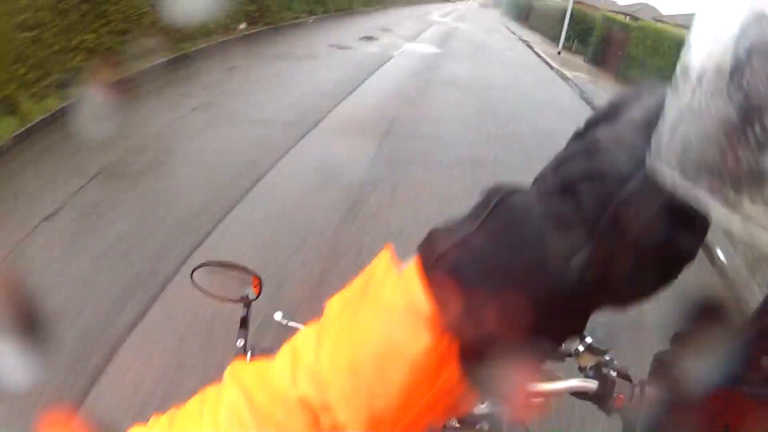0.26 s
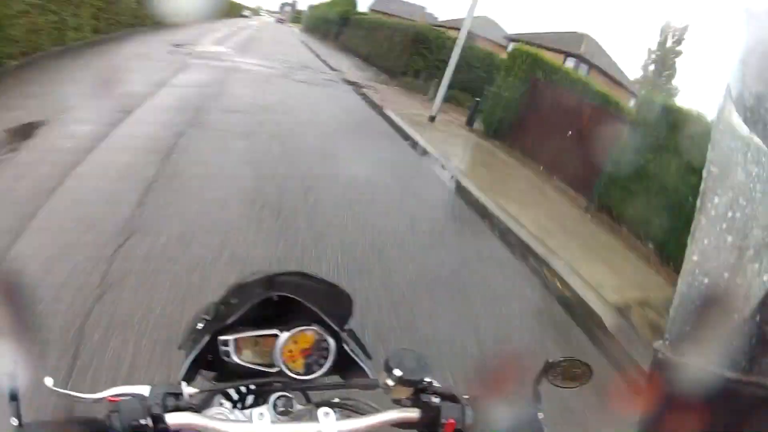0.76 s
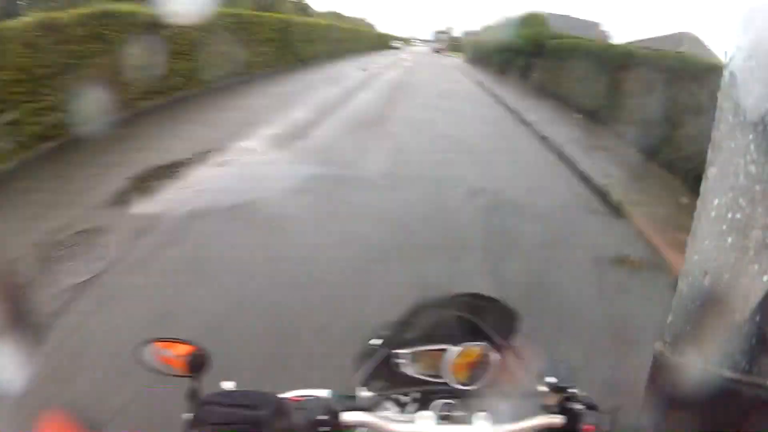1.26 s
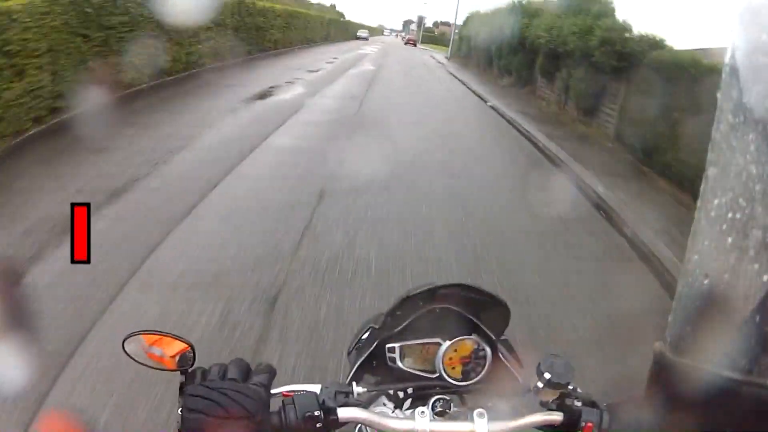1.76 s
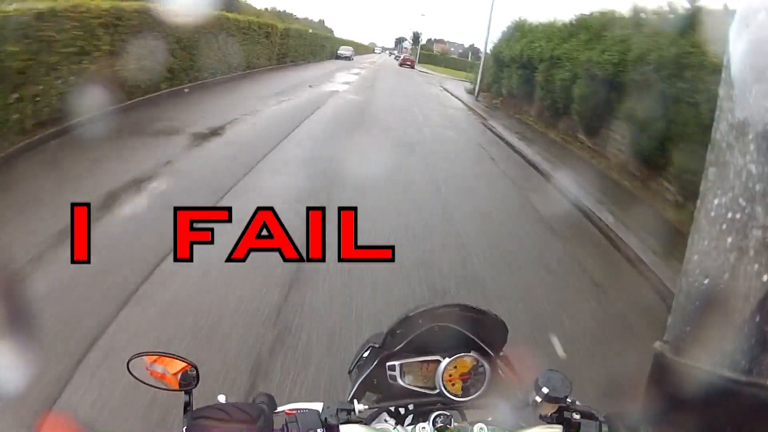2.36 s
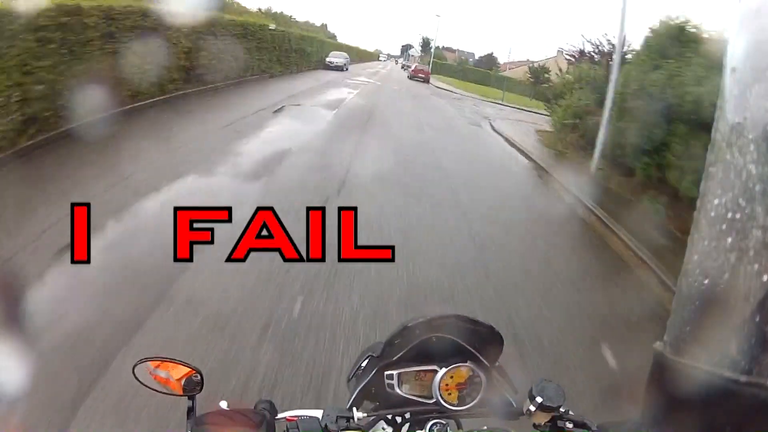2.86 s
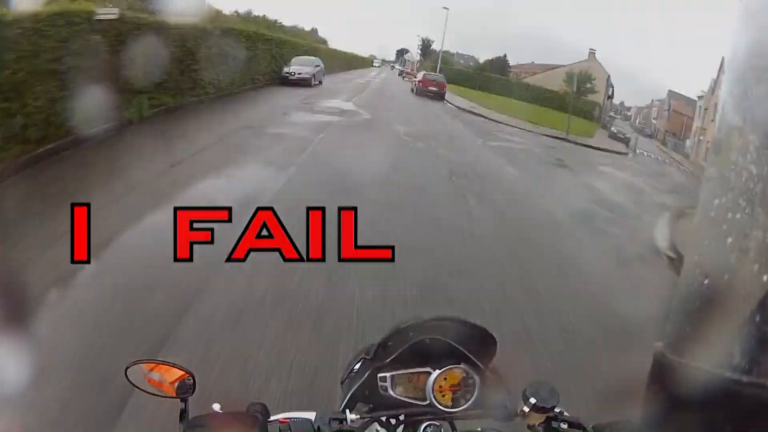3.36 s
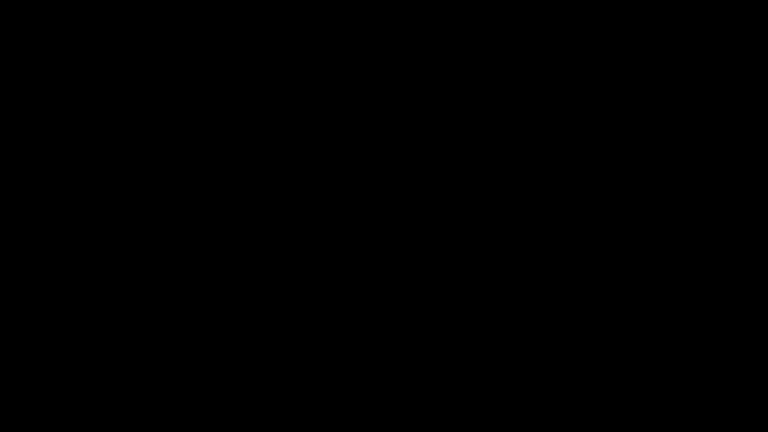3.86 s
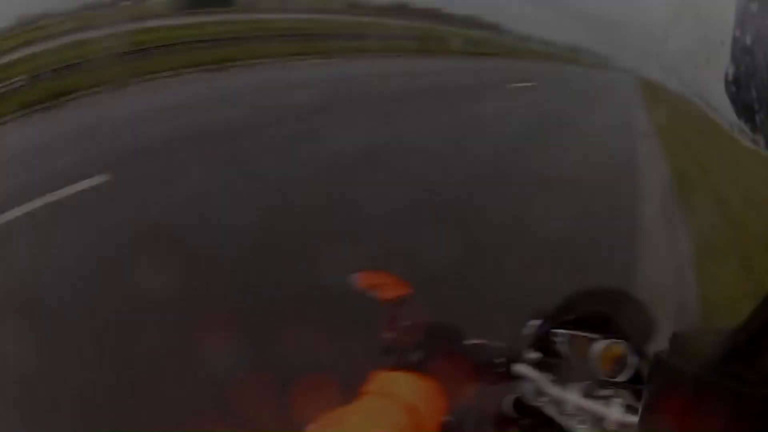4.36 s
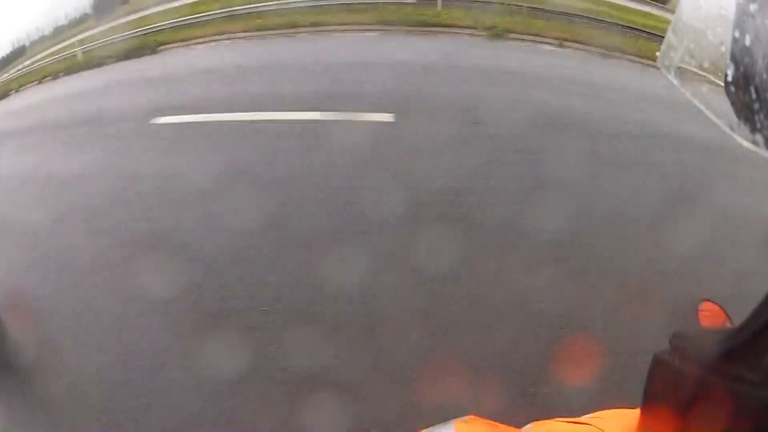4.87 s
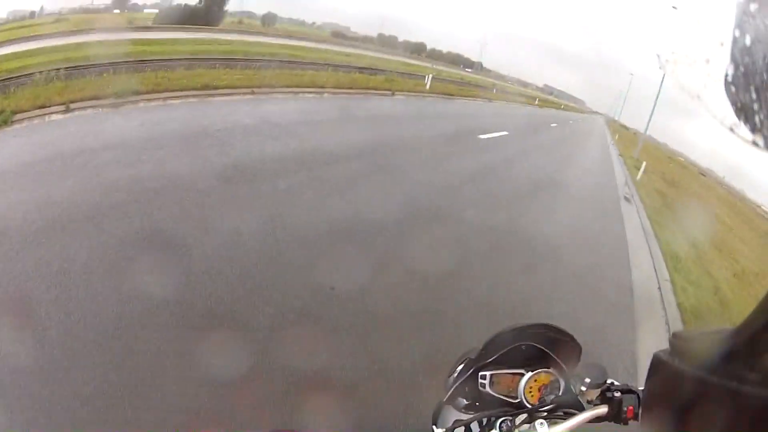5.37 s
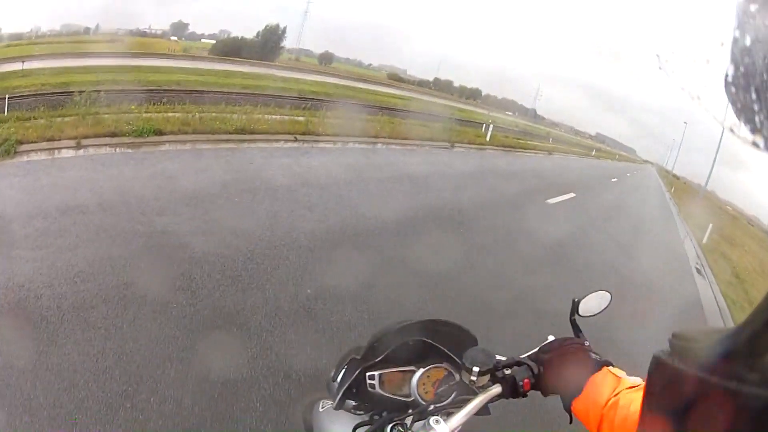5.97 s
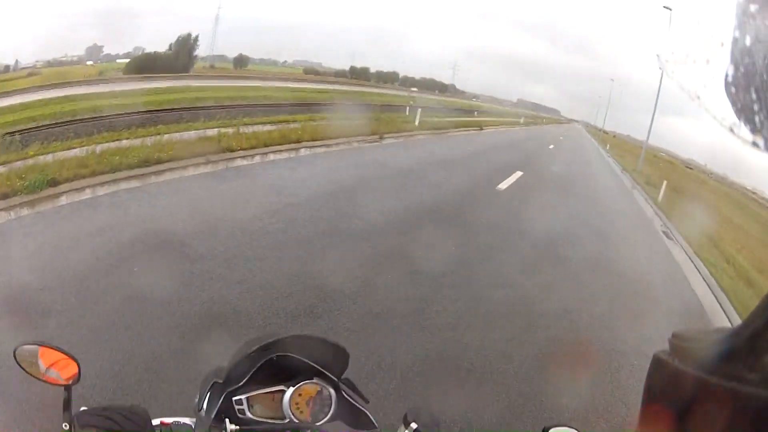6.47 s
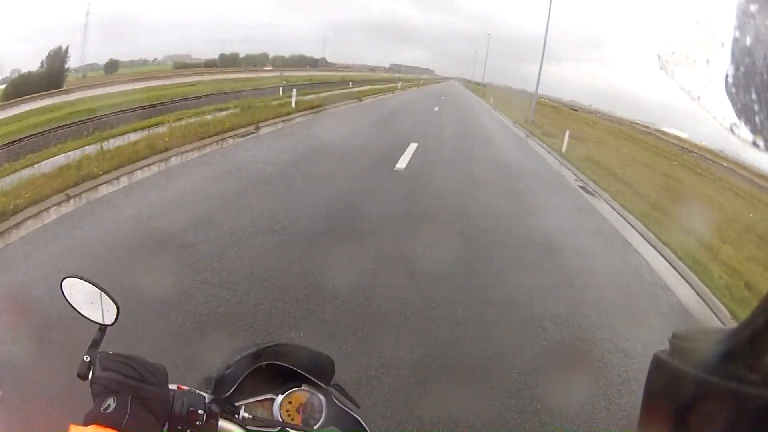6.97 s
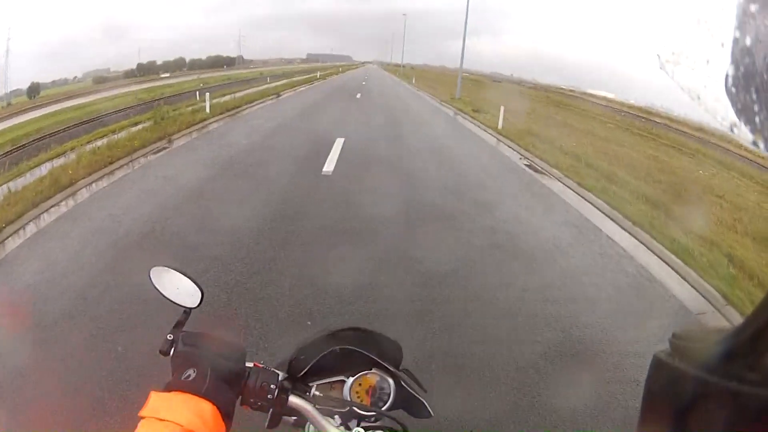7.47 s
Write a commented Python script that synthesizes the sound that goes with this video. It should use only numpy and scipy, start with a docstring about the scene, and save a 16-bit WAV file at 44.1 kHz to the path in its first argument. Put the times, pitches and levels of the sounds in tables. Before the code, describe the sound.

On a wet open road, wind roars and hisses around a cased helmet camera as a motorcycle pulls away, its rising drone half buried. A visor ratchets and slams shut, and raindrops splat sharply. The sound fades to silence, then returns much quieter: cloth swishes, the engine drops to a low pulsing idle with clatter and chirps, and drops tap the case.

```python
"""On a wet road, a helmet camera in a waterproof case rides a motorcycle through light rain.
Filtered noise roars and hisses round the case in gusts; two sine harmonics drone for the engine pulling away.
A glove slams the visor shut with short noise bursts; raindrops splat, and the loud hits duck the gain.
After a fade, pulses through a pipe make the three-cylinder engine sink to idle, with gear whine, valve clatter
and chirps; the jacket swishes as the rider looks back, and slower drops tap the ringing case."""
import sys
import numpy as np
from scipy import signal
from scipy.fft import rfft, irfft, next_fast_len
from scipy.io import wavfile
from scipy.ndimage import uniform_filter1d, map_coordinates

SR = 44100
rng = np.random.default_rng(int(sys.argv[2]) if len(sys.argv) > 2 else 0)


def wav_out(sig):
    """Save sig, one row per channel (or a flat mono array), as 16-bit PCM at SR to the path in sys.argv[1]."""
    wavfile.write(sys.argv[1], SR, np.round(np.clip(np.atleast_2d(sig).T, -1, 1) * 32767).astype(np.int16))


N = 340452  # length in samples


def amp(db):
    """Decibels to gain."""
    return 10 ** (np.asarray(db) / 20)


def unit(x):
    """Scaled to rms 1."""
    return x / np.sqrt(np.mean(x ** 2) + 1e-20)


def clock():
    """The time of every sample, in seconds."""
    return np.arange(N) / SR


def ramp(start_s, length_s):
    """0 before the start, rising straight to 1."""
    return np.clip((clock() - start_s) / length_s, 0, 1)


def bell(x, centre, width):
    """A bell of height 1 with its full width at half height."""
    return np.exp2(-np.minimum((2 * (x - centre) / width) ** 2, 40))


def bumps(rows, x):
    """dB of (centre, width, dB) bells: resonances along frequency, or swells along time."""
    return sum(db * bell(x, centre, width) for centre, width, db in rows)


def along(points, hz):
    """(Hz, value) points read on a log axis."""
    f, v = np.transpose(points)
    return np.interp(np.log(hz + 1), np.log(f + 1), v)


def curves(rows):
    """One value per sample for each column after the time."""
    s, *cols = np.transpose(rows)
    return [np.interp(clock(), s, c) for c in cols]


def noise():
    """Fresh white noise."""
    return rng.standard_normal(N)


def wobble(rate):
    """A smooth random curve, rate knots a second."""
    knots = rng.standard_normal(int(N * rate / SR) + 4)
    return map_coordinates(knots, [np.arange(N) * rate / SR])


def add(track, s, sound):
    """Mix a sound into the track at time s."""
    part = track[round(s * SR):][:len(sound)]
    part += sound[:len(part)]


def coloured(x, db_of):
    """x through a causal, minimum-phase filter whose gain in dB is db_of(Hz)."""
    m = 2 * next_fast_len(len(x) // 2 + 4096)
    cepstrum = irfft(np.log(amp(db_of(np.fft.rfftfreq(m, 1 / SR))) + 1e-6), m)
    # fold the cepstrum forward in time, so nothing sounds before its cause
    cepstrum[1:m // 2] *= 2
    cepstrum[m // 2 + 1:] = 0
    return irfft(rfft(x, m) * np.exp(rfft(cepstrum)), m)[:len(x)]


# resonances and dead bands of the waterproof case: centre_hz, width_hz, nominal gain_db
CASE_RESONANCES = [(723.5, 45, 5), (1210, 220, 5), (3660, 330, 8.5), (4874, 990, 8.5), (6005, 470, -10),
                   (7080, 840, 5.5), (8360, 240, 9), (9420, 1400, 5), (10680, 450, 5.5), (12070, 1420, -16),
                   (13160, 260, 9)]


def cased(x, spectrum, peaks=()):
    """x with its own colour, heard through the camera case, at rms 1."""
    def gain_db(hz):
        return along(spectrum, hz) + bumps(CASE_RESONANCES, hz) + bumps(peaks, hz)
    return unit(coloured(x, gain_db))


def strike(spectrum, contact_s, tilt_db, after_db, after_t60, click=0, peaks=()):
    """A first click, a short burst of contact force and a weak rattle after it, through the case; peak 1."""
    t = np.arange(SR // 20) / SR
    contact = np.exp(-(t / contact_s) ** 2)
    rattle = amp(after_db - 60 * t / after_t60)
    force = (contact + rattle) * rng.standard_normal(len(t))
    force[0] += click

    def gain_db(hz):
        case_db = 0.97 * bumps(CASE_RESONANCES, hz)
        brightness_db = tilt_db * np.log2(hz / 3000 + .1)
        return along(spectrum, hz) + case_db + bumps(peaks, hz) + brightness_db
    hit = coloured(force, gain_db)
    return hit / np.abs(hit).max()


# gusts and lulls in the air stream: centre_s, length_s, roar_db, hiss_db
GUST_SWELLS = [(0.662, 0.12, 3.5, 6), (0.88, 0.28, -1, 0), (1.13, 0.2, 3, -1), (1.32, 0.19, 4.5, 3),
               (2.05, 0.37, 0.5, 1), (2.3, 0.061, 1, 1), (2.606, 0.16, 1, 0), (2.95, 0.3, 2.5, 0),
               (3.457, 0.14, 3, 1), (4.577, 0.2, 8, -1), (4.96, 0.33, 8.5, 0), (5.55, 0.12, 4.5, 0),
               (7.059, 0.06, 11, 0), (7.401, 0.1, 7.5, -4)]


def gusts():
    """dB that the gusts add to the roar and to the hiss."""
    t = clock()
    return sum(np.outer([roar_db, hiss_db], bell(t, s, length_s)) for s, length_s, roar_db, hiss_db in GUST_SWELLS)


# colour of the low thumping: pitch_hz, relative level_db
BUFFET_COLOUR = [(12, -20), (25, -9), (40, 1.5), (55, -10), (90, -21.5), (200, -78.5)]
# the camera shaking on its mount: centre_hz, width_hz, gain_db
MOUNT_RESONANCE = [(39, 5.4, 9.5)]
# large eddies that shake the camera: centre_s, length_s, level_db on top of the steady shaking
EDDY_HITS = [(0.22, 0.35, -23.5), (0.63, 0.13, -30.5), (1.09, 0.1, -35), (1.325, 0.074, -32),
             (1.598, 0.15, -44), (2.094, 0.25, -26), (2.362, 0.08, -23), (2.6, 0.062, -29.5),
             (3.102, 0.11, -28), (3.45, 0.14, -26.5), (3.675, 0.07, -28), (4.623, 0.07, -23),
             (4.84, 0.34, -44), (5.58, 0.17, -54), (6.3, 0.16, -52), (7.2, 0.28, -55)]


def buffeting(steady_db):
    """The camera shakes on its mount, a little all the time and harder in each large eddy."""
    t = clock()
    force = amp(steady_db) + sum(amp(db) * bell(t, s, length_s) for s, length_s, db in EDDY_HITS)
    return force * cased(noise(), BUFFET_COLOUR, MOUNT_RESONANCE)


# colour of the roar, in both rides: pitch_hz, relative level_db
ROAR_COLOUR = [(30, -34.5), (65, -7.5), (110, -2), (175, -1.5), (290, -9.5), (400, -14.5), (600, -22.5),
               (1000, -18.5), (1600, -34.5), (4000, -41.5), (16000, -57.5)]
SLOW_BUFFET_DB, SLOW_ROAR_DB = -59.5, -57  # at walking pace, between gusts


def breeze():
    """Light air bumps the slowly moving case."""
    roar_db = SLOW_ROAR_DB + gusts()[0]
    return buffeting(SLOW_BUFFET_DB) + amp(roar_db) * cased(noise(), ROAR_COLOUR)


# colour of the hiss: pitch_hz, relative level_db
HISS_COLOUR = [(200, -43), (700, -1), (1600, -3.5), (2800, 1), (4500, -10), (7000, -9.5), (11000, -13.5),
               (15300, -18)]
# air whistling in the gaps of the case: centre_hz, width_hz, gain_db
GAP_WHISTLES = [(2380, 425, 10), (9655, 520, 10), (14370, 1000, 14.5)]
# the raised arm stirs up the roar: centre_s, length_s, gain_db
ARM_SWELL = [(0.2, 0.36, 7.5)]
# the bike gathers speed until TOP_SPEED_S; the hiss grows faster than the roar
TOP_SPEED_S, ROAR_DB_PER_S, HISS_DB_PER_S = 2.65, 1.5, 3
FAST_ROAR_DB, FAST_HISS_DB = -25, -25  # at top speed, between gusts
FAST_BUFFET_DB = -35  # steady throughout


def ride_wind():
    """The air roars on the case and hisses in its gaps, louder with speed and in gusts."""
    t = clock()
    to_go_s = np.maximum(TOP_SPEED_S - t, 0)
    roar_gust_db, hiss_gust_db = gusts()
    flutter = wobble(45)  # shared by roar and hiss
    roar_db = FAST_ROAR_DB - ROAR_DB_PER_S * to_go_s + roar_gust_db + bumps(ARM_SWELL, t)
    hiss_db = FAST_HISS_DB - HISS_DB_PER_S * to_go_s + hiss_gust_db
    roar_db = roar_db + 0.84 * flutter + 1.7 * wobble(14)
    hiss_db = hiss_db + 1.15 * flutter + 0.66 * wobble(130)
    roar = amp(roar_db) * cased(noise(), ROAR_COLOUR)
    hiss = amp(hiss_db) * cased(noise(), HISS_COLOUR, GAP_WHISTLES)
    return buffeting(FAST_BUFFET_DB) + roar + hiss


# raindrops falling on the slow bike: start_s, peak_db, brightness_db_per_octave, ring_hz
SLOW_DROPS = [(3.9635, -20, -0.5, 1580), (4.568, -22, 0.5, 2450), (4.62, -25.5, -0.5, 1700),
              (4.6529, -28, -4, 1930), (4.7535, -22.5, 2, 3560), (5.189, -35, -1, 1950),
              (5.288, -25, 0.5, 2250), (5.604, -12.5, 0, 2470), (5.7127, -32, 0, 1950),
              (6.1643, -17.5, 0, 3334), (6.6062, -18, 0, 3000), (6.7883, -30.5, 0.5, 2496),
              (6.8935, -19.5, 0, 2130), (7.0292, -31.5, 0, 1950)]
# colour of a tap: pitch_hz, relative level_db
TAP_COLOUR = [(300, -50), (850, -12), (1200, -5), (1700, 2.5), (2400, -7), (3300, -1.5), (4500, -13.5),
              (8000, -8.5), (11000, -16), (15000, -20)]
# rings common to all taps: centre_hz, width_hz, gain_db
TAP_RINGS = [(1180, 200, 6), (2337, 390, 12), (3060, 180, 5), (3940, 870, 2.5), (6300, 2400, -8),
             (14400, 700, 9)]
DROP_RING_WIDTH_HZ, DROP_RING_DB = 600, 6  # the ring that the landing spot favours


def slow_rain():
    """Falling drops tap the case, which rings for a few milliseconds, at a pitch set by where they land."""
    out = np.zeros(N)
    for s, db, tilt_db, ring_hz in SLOW_DROPS:
        rings = TAP_RINGS + [(ring_hz, DROP_RING_WIDTH_HZ, DROP_RING_DB)]
        tap = strike(TAP_COLOUR, 0.0019, tilt_db, after_db=-5.5, after_t60=0.016, click=11.0, peaks=rings)
        add(out, s, amp(db) * tap)
    return out


# raindrops hitting at riding speed: start_s, splat peak_db, thud_db relative to the splat
FAST_DROP_HITS = [(0.7092, -8.5, -24), (0.844, -17.5, -19), (1.3055, -15.5, -20), (1.3537, -11.5, -18),
                  (1.3681, 2, -11.5), (1.8212, -8, -26), (2.0976, -1.5, -4.5), (2.4396, 1.5, -8.5),
                  (2.6495, -5.5, -6.5), (3.302, 0, -1.5), (3.491, -11, -24)]
# colour of a splat: pitch_hz, relative level_db
SPLAT_COLOUR = [(300, -9.5), (1500, -6.5), (2400, 6.5), (3300, 7), (5000, -6), (8000, -6.5), (11000, -20),
                (15000, -47)]


def fast_rain():
    """At speed each drop splats on the case and gives its wall one low push."""
    out = np.zeros(N)
    u = np.arange(SR // 20) / SR / 0.0012  # time in units of 1.2 ms
    push = 2 * u * (2 - u) * np.exp(-u)
    for s, db, thud_db in FAST_DROP_HITS:
        splat = strike(SPLAT_COLOUR, 0.0029, tilt_db=5.0, after_db=-16.5, after_t60=0.014)
        add(out, s, amp(db) * (splat + amp(thud_db) * push))
    return out


def stroke(start_s, length_s, softness):
    """One movement: it speeds up from rest and slows to rest again."""
    return np.abs(np.sin(np.pi * ramp(start_s, length_s))) ** max(softness, .5)


# head turns that rub the jacket on the helmet: start_s, length_s, level_db, softness of the swell (exponent)
HEAD_TURNS = [(4.452, 0.19, -32, 0.56), (4.734, 0.56, -40.5, 2.4)]
# colour of the cloth: pitch_hz, relative level_db
CLOTH_COLOUR = [(150, 4.5), (400, -17), (800, -1.5), (1250, 2.5), (1800, -2), (2400, -6), (3000, -15),
                (5000, -27.5), (7500, -29), (10500, -17), (13500, -16), (15300, -28)]
CLOTH_SETTLE_S = 0.017  # the cloth rustles on a little after it has moved
# ribs of the weave in the first, quick turn: starting rate, time for it to halve, level
ZIP_HZ, ZIP_HALVING_S, ZIP_DB = 833, 0.085, -49


def jacket():
    """Stiff cloth slides over the helmet in tiny slips as the head turns; its weave zips in the quick turn."""
    sliding = sum(amp(db) * stroke(s, length_s, softness) for s, length_s, db, softness in HEAD_TURNS)
    keep = np.exp(-1 / (CLOTH_SETTLE_S * SR))
    sliding = signal.lfilter([1 - keep], [1, -keep], sliding)
    slips = noise() * amp(1.8 * wobble(400))
    rustle = cased(slips, CLOTH_COLOUR, [(1191, 550, 2.8), (3670, 280, 8.2), (8200, 300, 5.7)])
    swish = sliding * amp(1.3 * wobble(60)) * rustle
    s, length_s = HEAD_TURNS[0][:2]
    ribs_hz = ZIP_HZ * .5 ** (np.maximum(clock() - s, 0) / ZIP_HALVING_S)
    phase = 2 * np.pi * np.cumsum(ribs_hz) / SR + 0.43 * wobble(200)
    weave = np.sin(phase) + amp(-4) * np.sin(2 * phase)
    return swish + amp(ZIP_DB) * stroke(s, length_s, .5) * weave


# visor snapping through its detents, later shaken once: start_s, peak_db, contact_s, brightness_db_per_octave
VISOR_HITS = [(0.047, -11, 0.0025, 2.5), (.3250, -10, 0.012, -4), (0.3548, -5, 0.0064, -1),
              (0.4016, -4, 0.0032, 2), (0.4074, -1, 0.0088, 0), (0.4107, 29.5, 0.0008, 2.5),
              (3.429, -9.5, 0.0043, 1.5)]
# colour of a snap: pitch_hz, relative level_db
SNAP_COLOUR = [(100, -14.5), (800, 14), (2000, 1), (3200, 2), (5000, -9), (8500, -8), (15000, -11)]
# dull knocks on the helmet shell: start_s, peak_db
SHELL_KNOCKS = [(0.134, -19), (0.3206, -2), (0.358, -5.5), (0.375, -29), (.408, 4.5)]
# modes of the shell: pitch_hz, relative level_db, t60_s
SHELL_MODES = [(174.6, 19, 0.11), (200, 6, 0.058), (90, -16, 0.037)]


def visor():
    """The glove knocks the shell into decaying modes, and the visor ratchets down and slams in noise bursts."""
    out, t = np.zeros(N), np.arange(SR // 8) / SR
    for s, db, contact_s, tilt_db in VISOR_HITS:
        add(out, s, amp(db) * strike(SNAP_COLOUR, contact_s, tilt_db, after_db=-14.0, after_t60=0.023))
    shell = sum(amp(db - 60 * t / t60) * np.sin(2 * np.pi * hz * t) for hz, db, t60 in SHELL_MODES)
    shell = shell * (1 - np.exp(-t / 0.0025))  # soft onset
    for s, db in SHELL_KNOCKS:
        add(out, s, amp(db) * shell / np.abs(shell).max())
    return out


PULL_HZ, PULL_HZ_PER_S, PULL_DB = 128.6, 23, -34.5  # firing rate at the start, its climb, mean level
PULL_END_S, PULL_RELEASE_S = 1.13, 0.22  # the throttle has eased by PULL_END_S


def cruising_engine():
    """Pulling away, two harmonics of the climbing firing rate drone through the wind."""
    firing_hz = PULL_HZ + PULL_HZ_PER_S * clock()
    phase = 2 * np.pi * np.cumsum(firing_hz) / SR + 0.19 * wobble(40)
    throttle = 1 - ramp(PULL_END_S - PULL_RELEASE_S, PULL_RELEASE_S)
    drone = np.sin(2 * phase) + amp(-9) * np.sin(3 * phase)
    return throttle * amp(PULL_DB + 3.1 * wobble(15)) * drone


IDLE_S, CLUTCH_S = 4.75, 0.15  # the gears have unloaded at IDLE_S, over CLUTCH_S
WHINE_DB = -55  # before the surge


def gears(turns):
    """Meshing teeth whine, surging once per engine cycle of three firings."""
    surge = (.5 + .5 * np.cos(2 * np.pi * turns / 3)) ** 2
    mesh = 2 * np.pi * 31 * turns + .9 * wobble(110)
    whine = np.sin(mesh) + amp(-9) * np.sin(2 * mesh)
    return amp(WHINE_DB + 5.2 * wobble(60)) * (0.48 + surge) * whine


COAST_DRONE_DB = -51.5


def pipe_drone(turns):
    """While coasting, the sixth harmonic of the firing sings in the pipe and sinks with the engine."""
    phase = 2 * np.pi * 6 * turns
    return amp(COAST_DRONE_DB + 1.6 * wobble(12)) * np.sin(phase)


CHIRP_START_S, CHIRP_RISE_S, CHIRP_DB = 4.73, 0.35, -51.5  # level before load and flicker
CHIRP_CYCLES = 65.8  # chirp pitch over firing rate
CHIRP_ARCH_HZ, CHIRP_WANDER_HZ, CHIRP_FLICKER_DB = 55, 42, 3


def chirps(turns, rate):
    """At idle a part chirps unevenly with every firing; its pitch follows engine speed and arches in each chirp."""
    beat = 2 * np.pi * (turns - .8) + 1.1 * wobble(20)
    pitch_hz = CHIRP_CYCLES * rate + CHIRP_ARCH_HZ * np.cos(beat) + CHIRP_WANDER_HZ * wobble(140)
    load = 0.23 + 0.9 * (.5 + .5 * np.cos(beat)) ** 2
    level = ramp(CHIRP_START_S, CHIRP_RISE_S) * amp(CHIRP_DB + CHIRP_FLICKER_DB * wobble(30))
    return level * load * np.sin(2 * np.pi * np.cumsum(pitch_hz) / SR)


# colour of the valve clatter: pitch_hz, relative level_db
CLATTER_COLOUR = [(150, 7), (300, -1), (550, -6), (1000, -3), (1500, -4.5), (2300, -1), (3200, -12),
                  (4500, -25), (7500, -25), (10000, -20), (15300, -19.5)]
# thin steel resonances: centre_hz, width_hz, relative level_db
STEEL_MODES = [(2400, 160, -5), (3040, 67, -0.5), (3770, 166, -5), (10000, 84, 1), (13920, 130, -4)]
CLATTER_DB = -51.5
RING_DB, RING_DB_PER_S = -71, 2.4  # level at IDLE_S; the steel ring grows as the engine idles


def valves(turns):
    """Clatter and thin steel ringing, both noise, swell each time the valves seat."""
    seat = (.5 + .5 * np.cos(2 * np.pi * (turns - .8))) ** 3

    def steel_db(hz):
        gain = sum(amp(db) / (1 + (2 * (hz - centre) / width) ** 2) for centre, width, db in STEEL_MODES)
        return 20 * np.log10(gain)
    ring = unit(coloured(noise() * seat * amp(2.5 * wobble(25)), steel_db))
    clatter = cased(noise() * (1 + 0.15 * seat), CLATTER_COLOUR, [(3730, 250, 2.9), (8250, 260, 3)])
    ring_db = RING_DB + RING_DB_PER_S * (clock() - IDLE_S)
    return amp(CLATTER_DB) * clatter + amp(ring_db) * ring


# colour of the exhaust pipe: pitch_hz, relative level_db
PIPE_COLOUR = [(20, -12), (35, -27), (58, -1.5), (87, 0.5), (115, -7), (175, -21), (208, -11.5), (245, -11),
               (285, -37), (360, -32), (900, -56)]
EXHAUST_DB, EXHAUST_DB_PER_S = -44, -0.5  # level setting at IDLE_S, and its slow settling


def exhaust(turns):
    """One pulse per firing into the pipe; the three cylinders differ in strength."""
    fired = np.flatnonzero(np.diff(np.floor(turns)))
    cylinder_db = np.array([1.5, 0, -1.8])[np.arange(len(fired)) % 3]
    pulses = np.zeros(N)
    pulses[fired] = amp(cylinder_db + 1.2 * rng.standard_normal(len(fired)))
    level_db = EXHAUST_DB + EXHAUST_DB_PER_S * (clock() - IDLE_S)
    return amp(level_db) * cased(pulses, PIPE_COLOUR, [(88.5, 14, 4.5), (252.0, 23, 2.2), (203, 13, 3.2)])


# engine speed as it coasts, is declutched and settles to idle: time_s, mean firing_hz
FIRING_RATE = [(3.88, 43), (4.15, 43.4), (4.42, 40.3), (4.6, 42.3), (4.76, 26.5), (4.88, 29.2), (5.6, 29.2),
               (7.72, 28.5)]


def engine():
    """The slow engine hunts a little; everything follows the count of firings."""
    rate = curves(FIRING_RATE)[0] * (1 + 0.005 * wobble(7))
    turns = np.cumsum(rate) / SR  # counts firings
    coasting = 1 - ramp(IDLE_S - CLUTCH_S, CLUTCH_S)
    driven = coasting * (gears(turns) + pipe_drone(turns))
    return exhaust(turns) + driven + chirps(turns, rate) + valves(turns)


CUT = 3.885  # s, the silent point between the two rides


def scene():
    """The fast ride, then the slow one, on a single microphone."""
    fast = ride_wind() + fast_rain() + visor() + cruising_engine()
    slow = breeze() + slow_rain() + jacket() + engine()
    mono = np.where(clock() < CUT, fast, slow)
    return np.array([mono, mono])


def limited(x, ceiling_db, release_s):
    """Peaks over the ceiling pull the gain down at once; it creeps back exponentially."""
    over_db = np.maximum(20 * np.log10(np.abs(x).max(axis=0) + 1e-9) - ceiling_db, 1e-9)
    age = clock() / release_s
    # a running maximum in the log domain: the strongest decaying peak wins
    duck_db = np.exp(np.maximum.accumulate(np.log(over_db) + age) - age)
    return x * amp(-uniform_filter1d(duck_db, size=48))


FADE_OUT_S, FADE_IN_S, FADE_BEND = 0.28, 0.54, 0.96  # either side of the cut; bend 1 = straight
TOP_HZ = 15400  # nothing sounds from here up


def record(dry):
    """The camera's limiter, the fade between the rides and the band limit."""
    fader = (1 - ramp(CUT - FADE_OUT_S, FADE_OUT_S) + ramp(CUT, FADE_IN_S)) ** FADE_BEND
    faded = np.clip(limited(dry, ceiling_db=-2.5, release_s=0.084), -1, 1) * fader
    m = next_fast_len(N + SR // 2)
    passband = np.fft.rfftfreq(m, 1 / SR) < TOP_HZ
    return irfft(rfft(faded, m) * passband, m)[:, :N]


dry = scene()
out = record(dry)
wav_out(out)
```